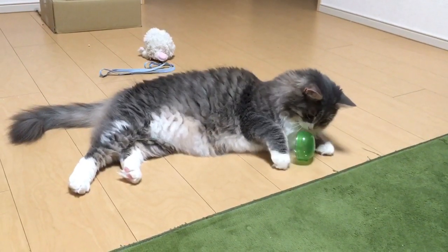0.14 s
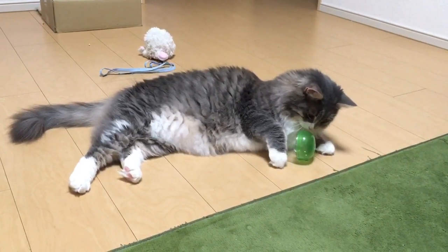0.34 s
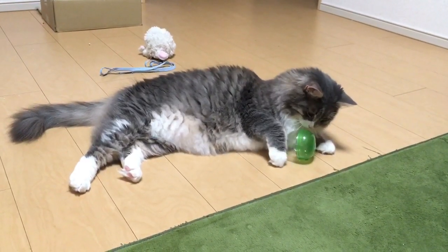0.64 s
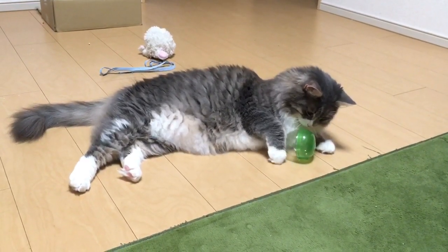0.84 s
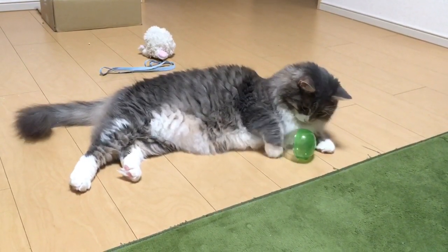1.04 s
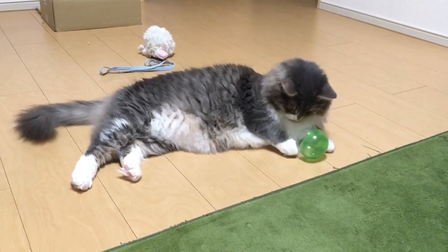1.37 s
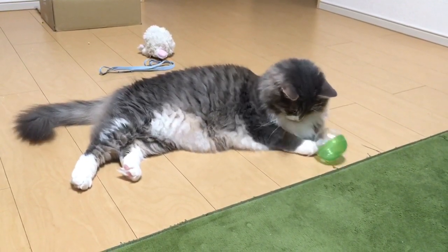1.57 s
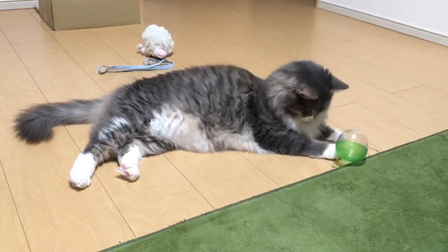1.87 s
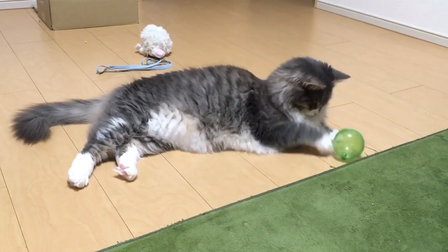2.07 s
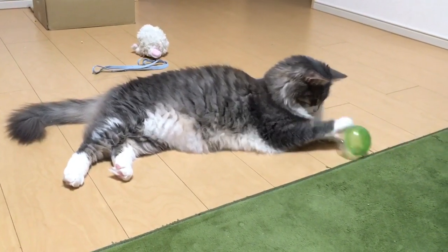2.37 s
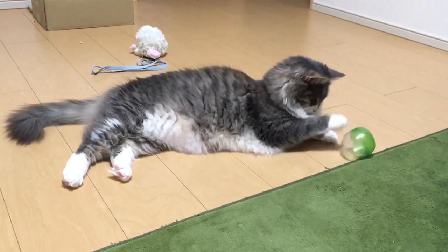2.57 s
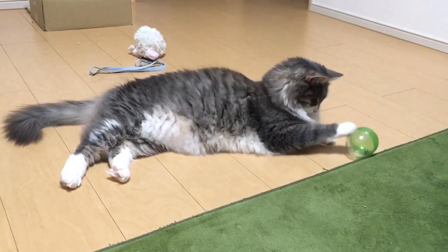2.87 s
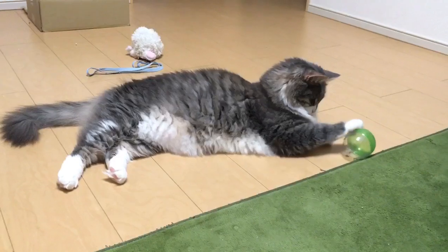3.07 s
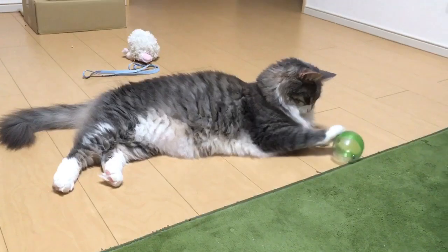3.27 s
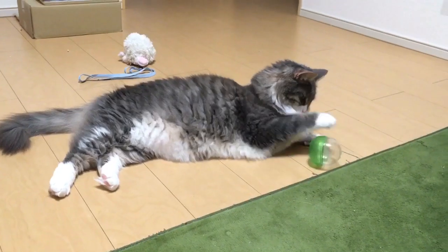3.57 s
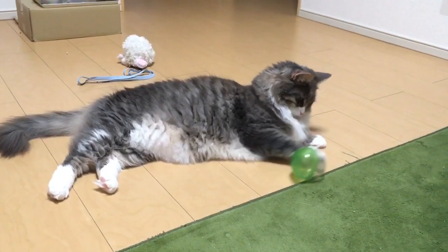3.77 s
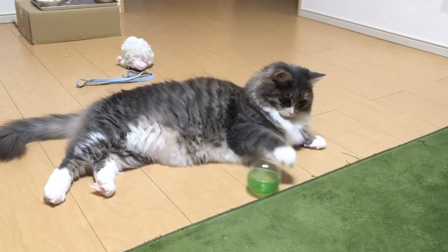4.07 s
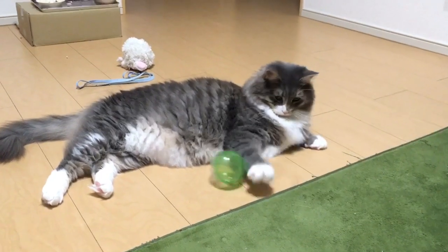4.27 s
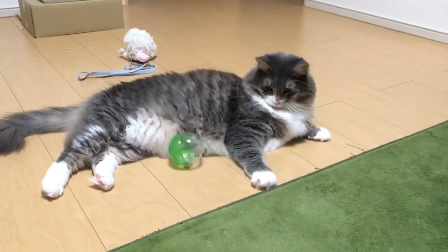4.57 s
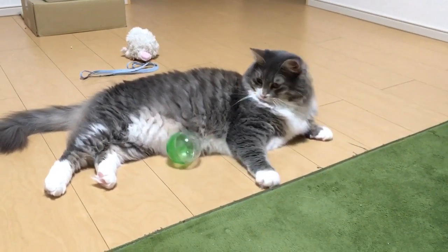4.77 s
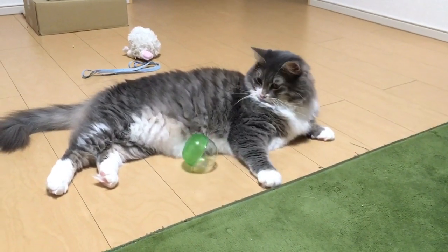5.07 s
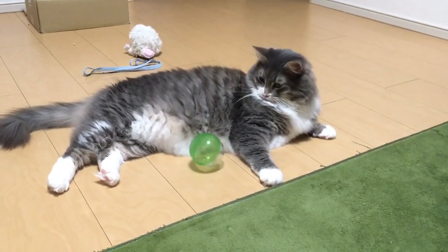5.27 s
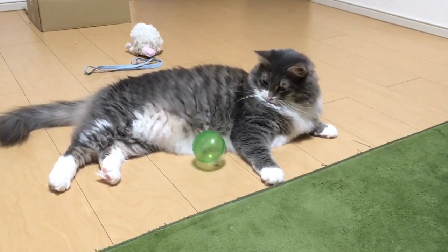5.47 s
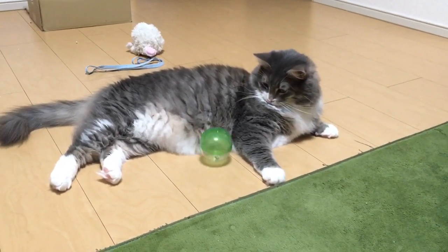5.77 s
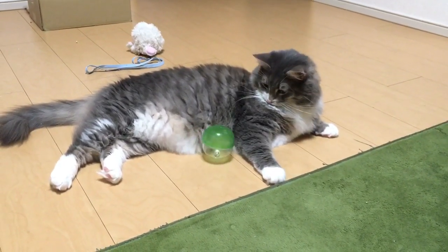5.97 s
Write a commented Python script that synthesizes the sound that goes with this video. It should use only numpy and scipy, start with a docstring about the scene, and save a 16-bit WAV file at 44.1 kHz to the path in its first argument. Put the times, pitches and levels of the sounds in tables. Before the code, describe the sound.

A cat bats a hollow plastic ball over a wooden floor, with light clicks, rattles and soft rolling in a quiet room.

```python
"""First the hush of a quiet room, with a tiny steady tick, a brief low rumble and a faint thin tone.
Then, a little over a second in, a cat paws a hollow plastic ball over the wooden floor.
The thin shell clicks on the boards and under the claws, and the boards answer with a dull knock.
Rolling and rubbing are swarms of tiny contacts; a small bell in the ball rings faintly.
One microphone, near enough that the direct sound stands well above the room's reflections."""
import sys
import numpy as np
from scipy import signal
from scipy.fft import rfft, irfft
from scipy.io import wavfile

SR = 44100
rng = np.random.default_rng(int(sys.argv[2]) if len(sys.argv) > 2 else 0)


def waveform_to_disk(signal):
    """Save audio, clipped to [-1, 1], as 16-bit WAV at the path in sys.argv[1]."""
    frames = np.transpose(np.atleast_2d(signal))
    scaled = np.clip(frames, -1, 1) * 32767
    samples = np.round(scaled).astype(np.int16)
    wavfile.write(sys.argv[1], SR, samples)


N = 270333

# Levels in the tables are relative; t60_s is the time to die away by 60 dB.
# room rumble and microphone hiss: frequency_hz, density_db
HUSH_SPECTRUM = [(15, -39), (25, -4), (107, -8.5), (333, -19.5), (371, -16), (500, -25.5), (604, -23.5),
                 (749, -27.5), (2660, -33.5), (2970, -35), (3220, -35), (15800, -42)]
# how long the room rings: frequency_hz, t60_s
ROOM_DECAY = [(200, 0.094), (1000, 0.29), (3000, 0.09), (8000, 0.15), (15000, 0.16)]
# modes of the floorboards and of the bell: pitch_hz, level_db, t60_s
BOARD_MODES = [(189, -20, 0.063), (222, 0, 0.071), (267, -0.5, 0.052), (278.4, -2.5, 0.058),
               (349, 1, 0.061), (433.3, -6, 0.059), (519.3, -14, 0.11), (683, -10.5, 0.017)]
BELL_MODES = [(3330, -3, .1), (3390, -4, .08), (7930, -2, .06), (9500, -10, .04), (11290, -5, .05)]
# the shell's four families of modes, low to high: pitch_hz, level_db, t60_s
HOLLOW_MODES = [(787, -0.5, 0.0044), (1080, 7.5, 0.0063), (1218, 6.5, 0.009), (1506, -6, 0.016),
                (1757, 5.5, 0.0046), (2040, -2.5, 0.004)]
WALL_MODES = [(2043, 1, 0.0018), (2498, -8.5, 0.012), (2735, -3.5, 0.011), (2730, -6.5, 0.0031),
              (2924, -9, 0.011), (3140, -5, 0.0068), (3670, -3, 0.0039)]
GAP_MODES = [(4030, -4, 0.0029), (4740, 0, 0.002), (5470, -9, 0.0069), (6100, -5.4, 0.0042)]
SEAM_MODES = [(6740, -2, 0.003), (7370, -10, 0.016), (8130, -2, 0.0039), (8714, -2.5, 0.012),
              (9480, -5.5, 0.017), (10380, -4.5, 0.0044), (11430, -5, 0.0065), (12660, -8.5, 0.0045),
              (13460, -7, 0.0047), (15300, -15, 0.0042), (15800, -19, 0.0066)]
# knocks of the ball on the boards: start_s, level_db
FLOOR_KNOCKS = [(1.439, -47.5), (1.524, -48.5), (1.777, -47.5), (1.807, -46.5), (2.142, -27.5),
                (2.177, -25), (2.205, -41), (2.231, -42), (2.347, -36.5), (2.408, -30.5), (2.485, -34.5),
                (2.553, -38), (2.59, -38), (2.663, -40), (2.742, -42.5), (2.8, -43), (2.864, -40),
                (2.892, -48), (2.966, -42.5), (3.052, -46.5), (3.133, -43.5), (3.267, -51), (3.428, -48),
                (3.469, -47), (3.501, -53), (3.578, -43), (3.652, -43.5), (3.676, -37.5), (3.75, -46),
                (3.766, -40), (4.041, -49.5), (4.165, -26), (4.193, -30.5), (4.206, -32), (4.309, -41),
                (4.333, -28.5), (4.395, -34.5), (4.405, -33), (4.456, -43), (4.519, -38.5), (4.586, -33),
                (4.62, -28), (4.707, -30), (4.738, -35), (4.834, -44), (4.853, -39.5), (4.887, -35.5),
                (4.907, -35), (4.931, -34.5), (5.008, -29), (5.03, -35), (5.047, -38), (5.158, -43.5),
                (5.191, -41), (5.214, -39), (5.246, -40.5), (5.304, -40.5), (5.343, -38), (5.397, -43),
                (5.487, -41), (5.531, -41), (5.59, -43), (5.671, -48), (5.726, -41), (5.773, -35),
                (5.797, -34), (5.837, -44), (5.885, -38.5), (6.023, -38.5), (6.053, -38.5), (6.076, -38)]
# lurches of the ball, each a swell and a fade; the shares are against the scuff:
# peak_s, swell_s, fade_db_per_s, rumble_db, scuff_db, wall_share_db, grit_share_db
BALL_LURCHES = [(1.225, 0.11, 130, -65, -85, 8.5, 6), (1.539, 0.22, 67, -63, -85, 1, 7.5),
                (1.68, 0.11, 99, -62.5, -84, -15, 6), (1.81, 0.081, 400, -60.5, -77.5, -29, 8.5),
                (1.924, 0.22, 226, -95, -67.5, -16, -5), (2.1, 0.021, 96, -95, -70.5, -17, -4.5),
                (2.187, 0.015, 120, -41.5, -53.5, -4.5, -1.5), (2.42, 0.27, 137, -45.5, -56.5, -7, 0.5),
                (2.561, 0.031, 231, -50.5, -50, 6, 4), (2.684, 0.063, 110, -47, -65, -2.5, -0.5),
                (2.868, 0.016, 140, -51, -62, -5.5, -2), (2.976, .03, 245, -50, -66.5, 1, -1),
                (3.111, 0.082, 114, -52, -63, -3, -4.5), (3.283, 0.039, 113.5, -56.5, -61.5, -8, -10.5),
                (3.532, 0.16, 142, -52, -59, -3, -7), (3.69, 0.041, 252, -50, -62.5, -9, -5.5),
                (3.767, 0.024, 332, -51.5, -58, -12, 1), (3.845, 0.017, 113, -77, -51.5, 2.5, 0),
                (3.99, 0.11, 150, -90, -64, 2.5, -18), (4.065, 0.015, 286, -70, -51, -12, -4),
                (4.185, 0.012, 226, -40.5, -53, -32, -4), (4.33, 0.089, 56, -43.5, -59, -11, -2),
                (4.41, 0.081, 139, -51, -57.5, 1.5, -2), (4.631, 0.2, 306, -43.5, -65.5, 6, -8),
                (4.725, 0.023, 148, -40.5, -58, -12, -7.5), (4.911, 0.15, 150, -45.5, -62.5, -5, -12),
                (5.039, 0.029, 206, -42, -63, -19, -10), (5.16, 0.075, 176, -48.5, -64, 5, 0.5),
                (5.24, 0.075, 90, -51, -65.5, -25, 0.5), (5.31, 0.17, 83, -51.5, -62, -22, -3.5),
                (5.41, 0.078, 198, -51, -64, -3, -19.5), (5.549, 0.17, 92, -55.5, -61.5, -18, -7.5),
                (5.698, 0.092, 100, -50, -61.5, -39, -4.5), (5.829, 0.097, 143, -44.5, -61.5, -11.5, -32),
                (6.053, 0.066, 299, -43, -58, -18, -2)]
# single clicks on the shell: start_s, hollow_db, wall_db, seam_db
SHELL_TAPS = [(1.526, -70, -57, -60.5), (2.1418, -55, -44, -46), (2.165, -66, -46, -54),
              (2.1771, -27, -30, -30), (2.2076, -49, -50.5, -47), (2.2315, -57, -54, -42),
              (2.2483, -63, -39, -48), (2.291, -54, -40, -45), (2.3187, -52, -65, -40),
              (2.356, -37, -48, -33), (2.3634, -29, -29.5, -19.5), (2.4076, -36, -33, -18.5),
              (2.4214, -32.5, -53, -51), (2.484, -38, -44, -33), (2.532, -26, -24, -18.5),
              (2.5934, -47, -34, -47), (2.6782, -40, -53, -50), (2.7676, -50, -53, -54),
              (2.854, -69, -49, -52), (2.967, -53, -41, -44), (3.2702, -65, -44, -52.5),
              (3.472, -44.5, -40, -52), (3.676, -41, -37, -42), (3.6879, -40, -43, -50),
              (3.7553, -40.5, -41, -56), (3.7659, -32.5, -23, -35), (3.8306, -58, -13.5, -24.5),
              (4.0439, -33.5, -35.5, -33), (4.056, -31.5, -42, -42), (4.1651, -36, -31.5, -35),
              (4.193, -39, -33, -36.5), (4.2086, -35, -43, -38.5), (4.3109, -39, -34, -41),
              (4.324, -61, -27, -32.5), (4.3336, -31, -52, -47), (4.3634, -34, -23, -37),
              (4.3926, -29, -27, -31), (4.4063, -34.5, -28, -43), (4.4496, -62, -60, -38.5),
              (4.5131, -43, -45, -43.5), (4.519, -40.5, -42, -47), (4.5466, -65, -33.5, -58),
              (4.555, -42, -31, -42), (4.589, -65, -40, -48.5), (4.674, -70, -38, -57),
              (4.7073, -34.5, -37, -40.5), (4.7252, -41, -47, -44), (4.8553, -40.5, -27, -40.5),
              (4.8871, -63, -34, -38), (4.909, -58, -45, -39.5), (4.919, -42, -46, -50.5),
              (5.0083, -42, -46, -46), (5.0315, -37.5, -28.5, -39), (5.1555, -42, -45, -55),
              (5.1898, -43, -64, -48), (5.22, -65, -61, -43), (5.3099, -57, -65, -43),
              (5.3366, -46, -53, -48), (5.3463, -53.5, -45, -46), (5.59, -44, -60, -56),
              (5.728, -56, -76, -47), (5.772, -71, -49, -49), (5.7939, -38, -55, -36.5),
              (5.8042, -42, -52, -39.5), (5.822, -41, -63, -41), (5.84, -61, -74, -49),
              (5.8681, -42, -62, -40), (5.8756, -38, -63, -39.5), (6.013, -47, -52, -45)]
# runs of quick rebounds: start_s, length_s, first_interval_s, interval_ratio,
# loss_db_per_rebound (negative grows louder), hollow_db, wall_db, gap_db, seam_db
REBOUND_RUNS = [(2.551, .028, .0122, 1.1, 4, -36.5, -15.5, -48, -30.5),
                (3.5316, .062, 0.008, 1.025, -1, -73, -45, -59, -75),
                (3.843, 0.06, 0.013, 0.77, 2, -30.5, -22.5, -56, -35),
                (4.069, 0.089, 0.016, 0.95, .6, -55, -63, -39, -54),
                (4.608, 0.042, 0.012, .96, -2, -50.5, -34.5, -45, -55),
                (4.754, 0.037, 0.011, 1.05, 2.5, -65, -69, -39, -58),
                (5.0496, .031, .0117, .8, 3, -51, -33.5, -43, -45.5),
                (5.3948, 0.014, 0.0088, .55, -1, -53, -42, -80, -52),
                (6.02, 0.049, .0135, .85, 2.5, -48, -43, -49, -32)]
# gap modes in a single click, against the mean of wall and seam, as the ball turns: time_s, share_db
GAP_RESPONSE = [(2.15, 4.5), (2.25, 0.5), (2.4, -9.5), (2.55, -6), (3.7, -6), (4.05, -8), (4.18, 5),
                (4.37, 0.5), (4.45, -22), (4.56, -28), (4.71, 1), (5.03, -2.5), (5.2, -11), (5.8, -0.5)]
# how freely the bell answers, against the seam or grit, as the ball turns: time_s, share_db
BELL_RESPONSE = [(2.1, -21), (2.5, -48), (4.1, -52), (4.17, -14), (4.3, -29), (5.1, -24), (5.22, -19),
                 (5.3, -19), (5.4, -36), (5.55, -16), (5.75, -19), (5.9, -24)]


def from_db(db):
    """Decibels to gain."""
    return 10 ** (np.asarray(db) / 20)


def unit_rms(x):
    """Scale to rms 1."""
    return x / np.sqrt(np.mean(x ** 2) + 1e-20)


def at_hz(points, hz):
    """Read a (frequency_hz, value) table on a log-frequency axis."""
    points_hz, values = np.transpose(points)
    return np.interp(np.log(hz), np.log(points_hz), values)


def drift(rate_hz):
    """Slow random wander, rms 1."""
    pole = np.exp(-2 * np.pi * rate_hz / SR)
    return unit_rms(signal.lfilter([1], [1, -2 * pole, pole * pole], rng.standard_normal(N + SR))[SR:])


def ring(clicks, hz, t60_s):
    """One mode: a unit click starts a dying sine of height 1."""
    decay, angle = from_db(-60 / (t60_s * SR)), 2 * np.pi * hz / SR
    return signal.lfilter([0, np.sin(angle)], [1, -2 * decay * np.cos(angle), decay ** 2], clicks + 1e-18)


def strike(start_s, blow_db, modes, contact_s, spread_db):
    """Each blow starts every mode at a chance phase and strength; the ring swells over the contact time."""
    at, sound = np.round(start_s * SR).astype(int), np.zeros(N)
    strength = from_db(spread_db * rng.standard_normal((len(at), len(modes))))
    phase = np.exp(2j * np.pi * rng.random((len(at), len(modes))))
    swell = np.exp(-1 / (contact_s * SR))
    for k, (hz, level_db, t60_s) in enumerate(modes):
        push = np.full(N, 1e-18, complex)
        push[at] = from_db(blow_db + level_db) * strength[:, k] * phase[:, k]
        turn = np.exp(2j * np.pi * hz / SR)
        resonator = np.poly([swell * turn, from_db(-60 / (t60_s * SR)) * turn])
        sound += signal.lfilter([1 - swell], resonator, push).real
    return sound


def swarm(modes, per_s, size_db, clump_db, turn_db):
    """Tiny uneven contacts in clumps; as the contact point wanders, each mode comes and goes; rms 1."""
    contacts = rng.random(N) < per_s * from_db(clump_db * drift(25)) / SR
    sizes = contacts * from_db(size_db * np.minimum(rng.exponential(1, N), 4))
    sound = 0
    for hz, level_db, t60_s in modes:
        clicks = sizes * from_db(turn_db * drift(3.2)) * rng.standard_normal(N)
        sound += from_db(level_db) * ring(clicks, hz, t60_s)
    return unit_rms(sound)


def hush(level_db=-68.5, low_hz=27, top_hz=15950):
    """Steady room rumble and microphone hiss, cut off at both ends."""
    hz = np.maximum(np.fft.rfftfreq(N, 1 / SR), 1)
    colour = from_db(at_hz(HUSH_SPECTRUM, hz)) * (hz < top_hz) * (hz > low_hz)
    return from_db(level_db) * unit_rms(irfft(rfft(rng.standard_normal(N)) * colour, N))


def ticking(start_s=0.0105, period_s=0.05):
    """A faint bright tick at the microphone, probably from the camera's own works."""
    at = (np.arange(start_s, N / SR, period_s) * SR).astype(int)
    ticks = np.zeros(N)
    ticks[at] = from_db(-54 + 1.2 * rng.standard_normal(len(at))) * rng.choice([-1, 1], len(at))
    return signal.sosfilt(signal.butter(2, [4500, 13000], "band", fs=SR, output="sos"), ticks)


def whine(pitch_hz=3080, middle_s=3.2, half_width_s=0.7):
    """A faint, slightly unsteady tone rises out of the hush and sinks again."""
    t = np.arange(N) / SR
    level_db = -84 - 10 * ((t - middle_s) / half_width_s) ** 4 + 2.5 * drift(6.0)
    return from_db(np.maximum(level_db, -200)) * np.sin(2 * np.pi * pitch_hz * t)


def opening_ring(tone_hz=3060, tone_t60_s=3.4, boards_t60_s=0.16):
    """A faint thin tone dies away at the start, and so do boards still sounding from an earlier knock."""
    t = np.arange(N) / SR
    tone = from_db(-84 - 60 * t / tone_t60_s) * np.sin(2 * np.pi * tone_hz * t)
    rumble = swarm(BOARD_MODES, per_s=800, size_db=1.0, clump_db=1.0, turn_db=1.0)
    return tone + from_db(-56 - 60 * t / boards_t60_s) * rumble


def room(direct, level_db=-11, delay_s=0.0035):
    """Dense reflections reach the microphone just after the direct sound; each octave dies at its own rate."""
    t, tail = np.arange(int(0.8 * SR)) / SR, 0
    for low_hz in 100 * 2.0 ** np.arange(8):
        octave = signal.butter(2, [low_hz, min(2 * low_hz, 0.45 * SR)], "band", fs=SR, output="sos")
        decay = from_db(-60 * t / at_hz(ROOM_DECAY, np.sqrt(2) * low_hz))
        tail += signal.sosfilt(octave, rng.standard_normal(len(t))) * decay
    tail *= np.clip(t / delay_s - 1, 0, 1)
    return from_db(level_db) * signal.fftconvolve(direct, tail / np.sqrt(np.sum(tail ** 2)))[:N]


def floor_thump(pitch_hz=89, t60_s=0.12, hard_knock_db=-24.5):
    """The whole floor gives under each knock; a knock 1 dB softer moves it 2 dB less."""
    start_s, knock_db = np.transpose(FLOOR_KNOCKS)
    floor_mode = [(pitch_hz, -22.5, t60_s)]
    return strike(start_s, 2 * knock_db - hard_knock_db, floor_mode, contact_s=0.0067, spread_db=5.0)


def board_knocks(top_hz=800):
    """The ball knocks on the boards; the contact is soft, so the wood sounds dull."""
    start_s, knock_db = np.transpose(FLOOR_KNOCKS)
    push = np.zeros(N)
    push[np.round(start_s * SR).astype(int)] = from_db(knock_db - 9.0)
    knocks = sum(from_db(level_db) * ring(push, hz, t60_s) for hz, level_db, t60_s in BOARD_MODES)
    return signal.sosfilt(signal.butter(2, top_hz, fs=SR, output="sos"), knocks)


def lurch_gains(swell_db=17):
    """Gains of rumble, hollow, wall and grit: the lurches swell, fade and add in power."""
    t, power = np.arange(0, N + 64, 64) / SR, 0
    for peak_s, swell_s, fade_db_per_s, rumble_db, scuff_db, wall_db, grit_db in BALL_LURCHES:
        shape_db = np.where(t < peak_s, swell_db * (t - peak_s) / swell_s, fade_db_per_s * (peak_s - t))
        levels_db = np.array([rumble_db, scuff_db, scuff_db + wall_db, scuff_db + grit_db])
        power += from_db(levels_db[:, None] + shape_db) ** 2
    return [np.interp(np.arange(N) / SR, t, np.sqrt(layer)) for layer in power]


def rolling(paw_damping=0.6):
    """The ball trundles over the wood grain, shaking its bell, while fur and pads scuff the shell."""
    rumble_gain, hollow_gain, wall_gain, grit_gain = lurch_gains()
    bell_gain = grit_gain * from_db(6.5 + np.interp(np.arange(N) / SR, *np.transpose(BELL_RESPONSE)))
    grit_modes = np.array(GAP_MODES + SEAM_MODES) * [1, 1, paw_damping]   # the paw shortens their ring
    rumble = rumble_gain * swarm(BOARD_MODES, per_s=420, size_db=3.5, clump_db=2.0, turn_db=1.0)
    hollow = hollow_gain * swarm(HOLLOW_MODES, per_s=3000, size_db=2.5, clump_db=2.5, turn_db=2.0)
    wall = wall_gain * swarm(WALL_MODES, per_s=2200, size_db=4.5, clump_db=3.5, turn_db=-0.5)
    grit = grit_gain * swarm(grit_modes, per_s=5000, size_db=5.5, clump_db=7.0, turn_db=4.5)
    bell = bell_gain * swarm(BELL_MODES, per_s=200, size_db=1.0, clump_db=1.0, turn_db=2.0)
    return rumble + hollow + wall + grit + bell


def rebounds():
    """Clicks of each rattling run: the interval changes by a steady ratio, the level by a steady step."""
    clicks = []
    for start_s, length_s, first_s, ratio, loss_db, *family_db in REBOUND_RUNS:
        intervals_s = first_s * ratio ** np.arange(12)
        for count, after_s in enumerate(np.cumsum(intervals_s) - intervals_s):
            if after_s <= length_s:
                clicks.append((start_s + after_s, *(np.array(family_db) - loss_db * count)))
    return np.array(clicks)


def shell_clicks():
    """Where the shell is hit decides which family of modes speaks; the bell is shaken along."""
    tap_s, hollow_db, wall_db, seam_db = np.transpose(SHELL_TAPS)
    gap_db = (wall_db + seam_db) / 2 + np.interp(tap_s, *np.transpose(GAP_RESPONSE))
    taps = np.transpose([tap_s, hollow_db, wall_db, gap_db, seam_db])
    start_s, hollow_db, wall_db, gap_db, seam_db = np.vstack([taps, rebounds()]).T
    bell_db = seam_db + np.interp(start_s, *np.transpose(BELL_RESPONSE))
    hollow = strike(start_s, hollow_db - 11.0, HOLLOW_MODES, contact_s=0.00013, spread_db=-2.0)
    wall = strike(start_s, wall_db - 8.0, WALL_MODES, contact_s=0.00037, spread_db=2.0)
    gap = strike(start_s, gap_db, GAP_MODES, contact_s=0.00042, spread_db=2.5)
    seam = strike(start_s, seam_db - 5.0, SEAM_MODES, contact_s=0.0002, spread_db=4.5)
    bell = strike(start_s, bell_db, BELL_MODES, contact_s=0.00041, spread_db=5.0)
    return hollow + wall + gap + seam + bell


def scene():
    """Ball and boards in the room, over the hush; the boards radiate little below their first mode."""
    ball = shell_clicks() + board_knocks() + rolling()
    low_cut = signal.butter(4, 183.6, "high", fs=SR, output="sos")
    in_room = signal.sosfilt(low_cut, ball + room(ball) + opening_ring())
    return (in_room + floor_thump() + whine() + hush() + ticking())[None]


def record(dry, cutoff_hz=16900):
    """The microphone's signal, with the top cut steeply."""
    return signal.sosfilt(signal.cheby2(12, 60, cutoff_hz, fs=SR, output="sos"), dry)


dry = scene()
out = record(dry)
waveform_to_disk(out)
```